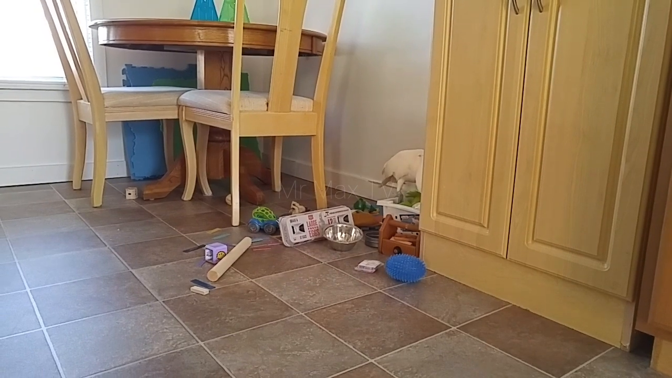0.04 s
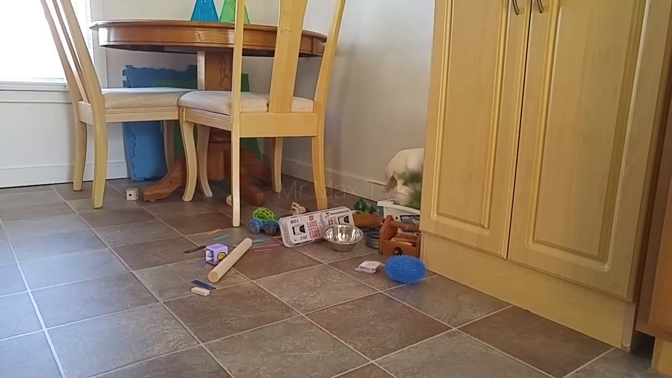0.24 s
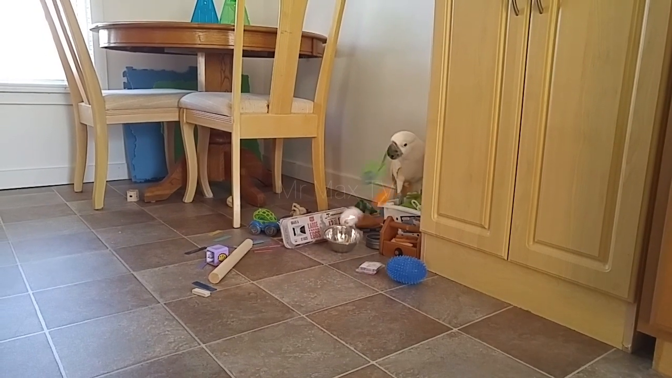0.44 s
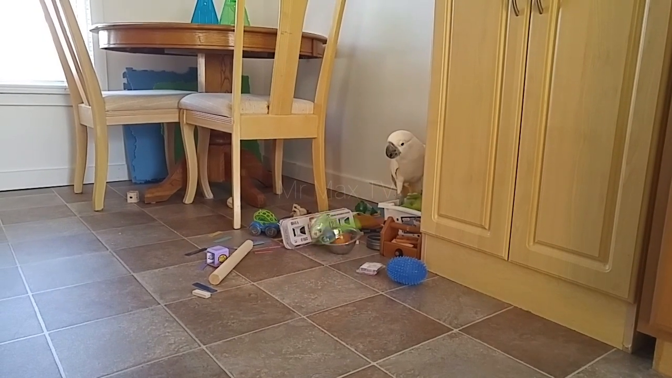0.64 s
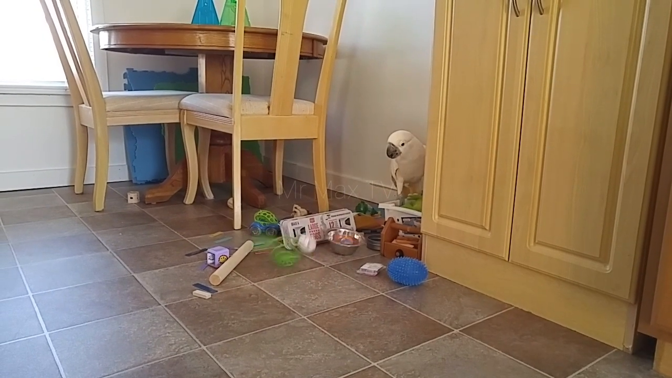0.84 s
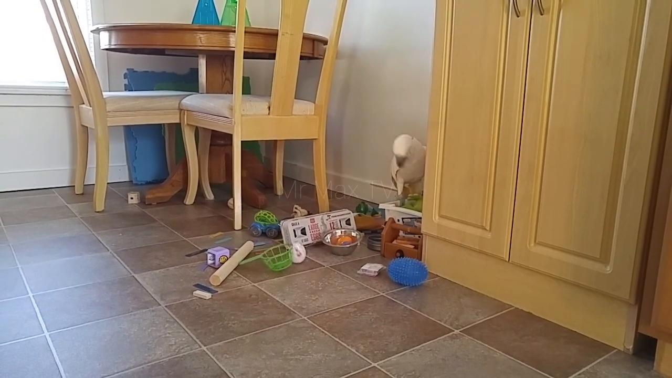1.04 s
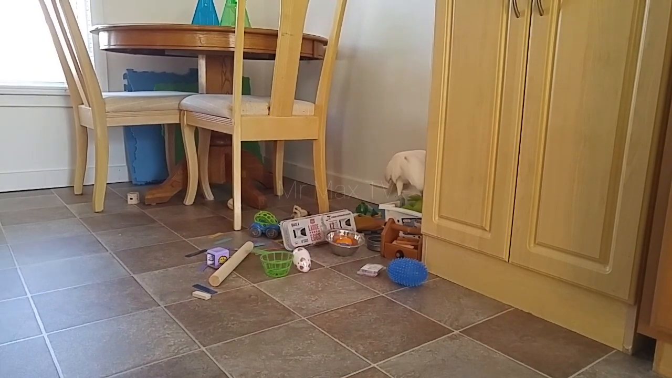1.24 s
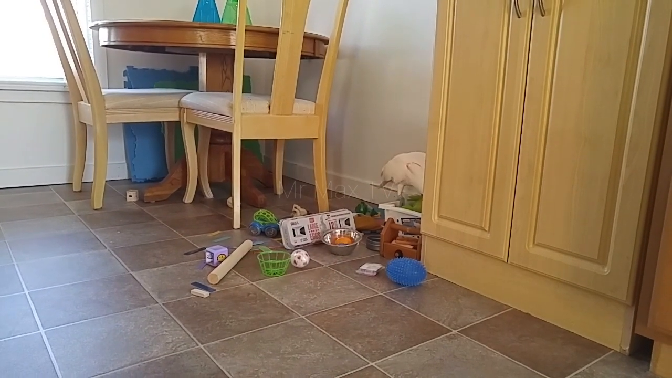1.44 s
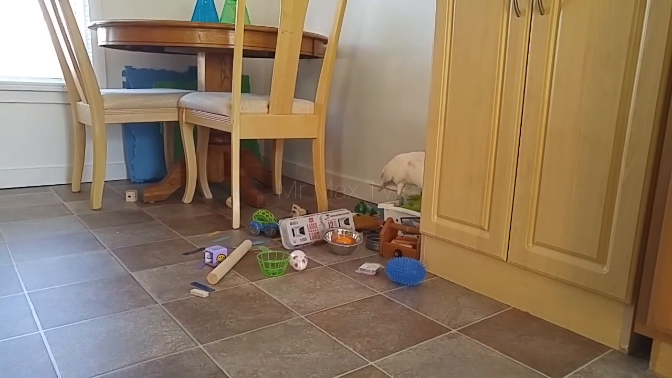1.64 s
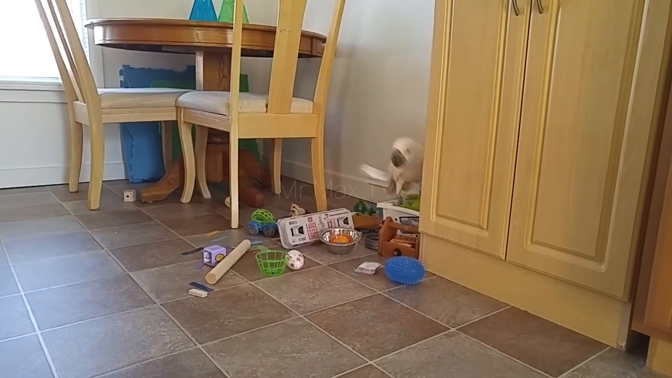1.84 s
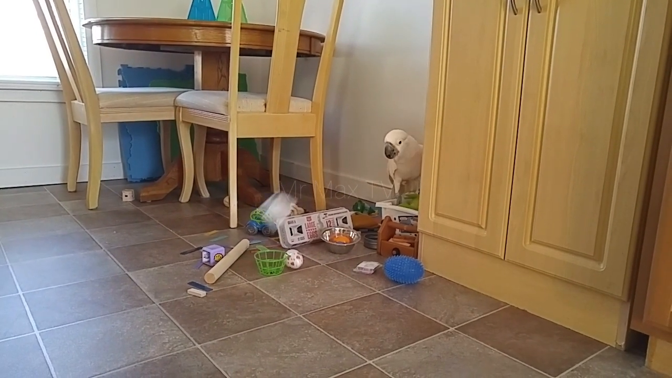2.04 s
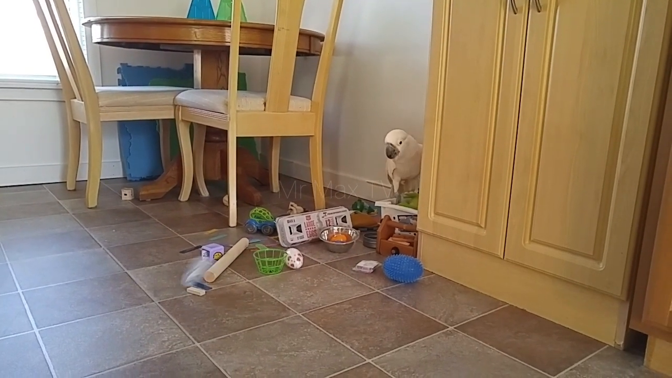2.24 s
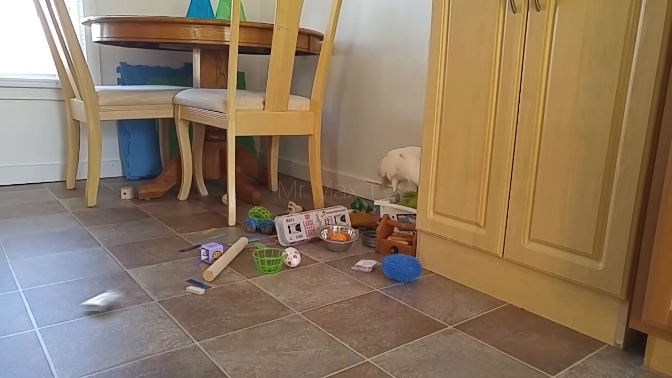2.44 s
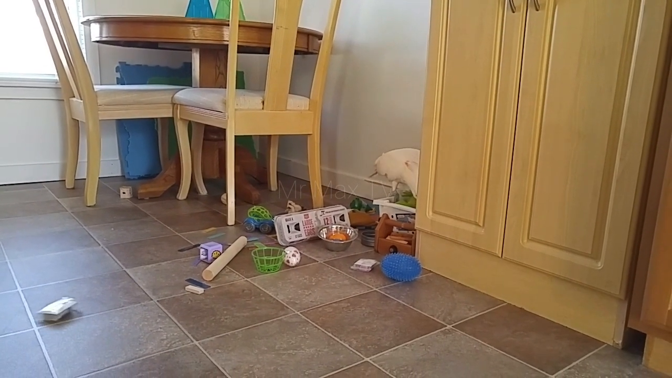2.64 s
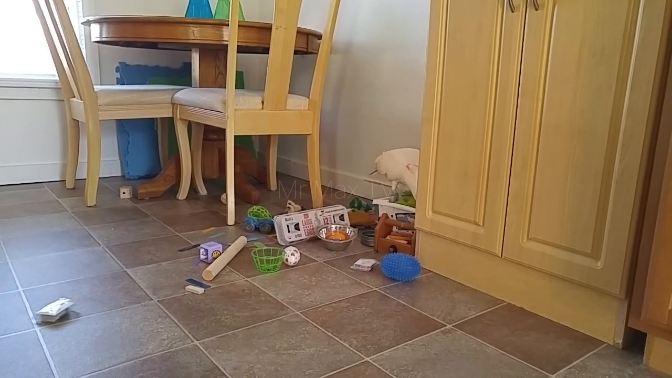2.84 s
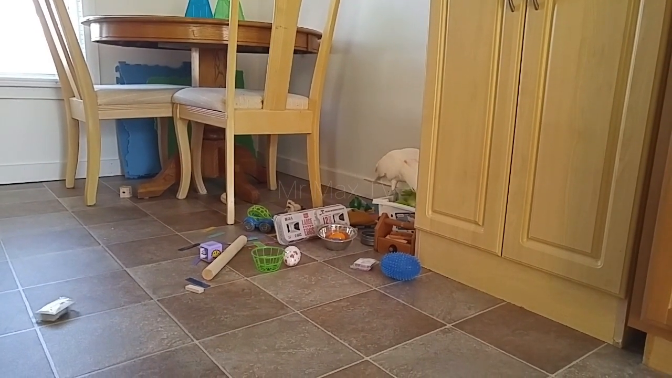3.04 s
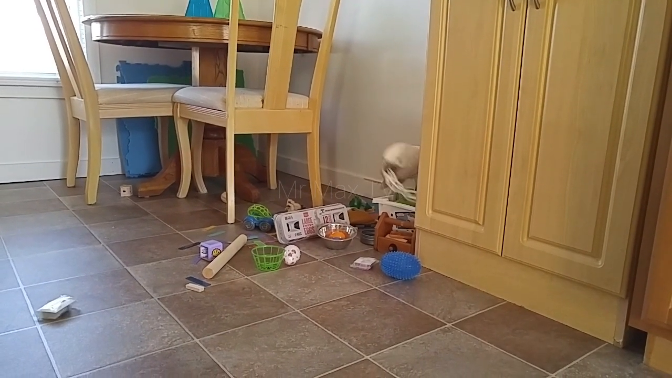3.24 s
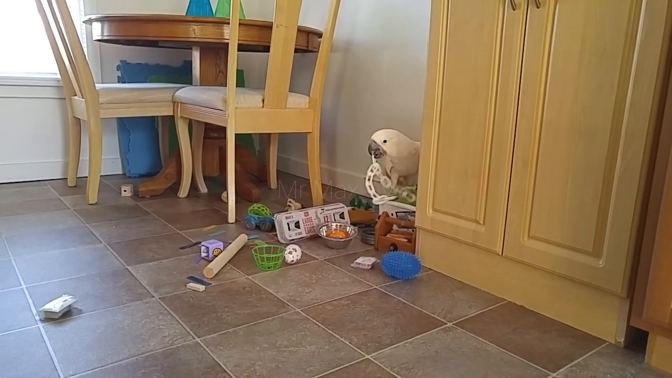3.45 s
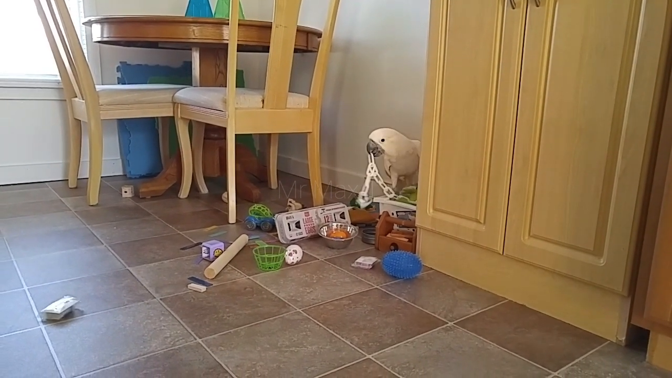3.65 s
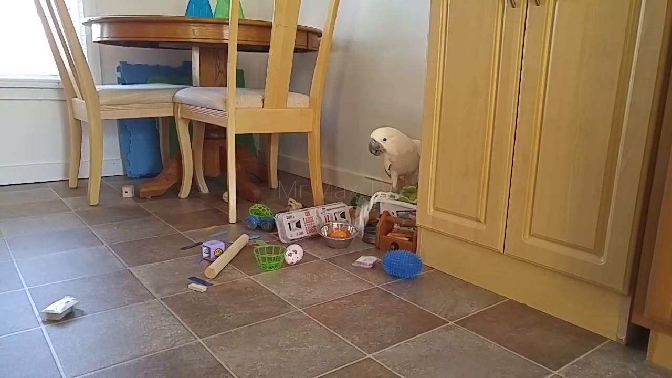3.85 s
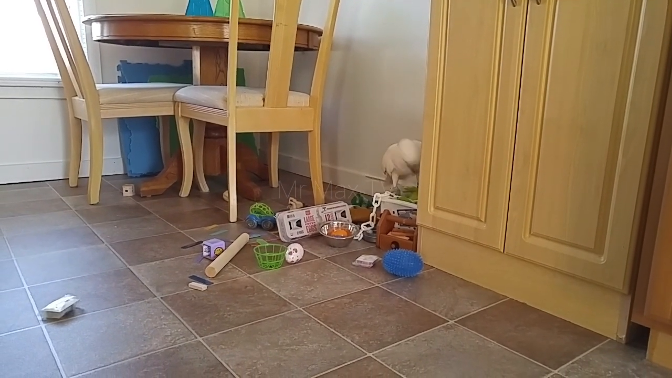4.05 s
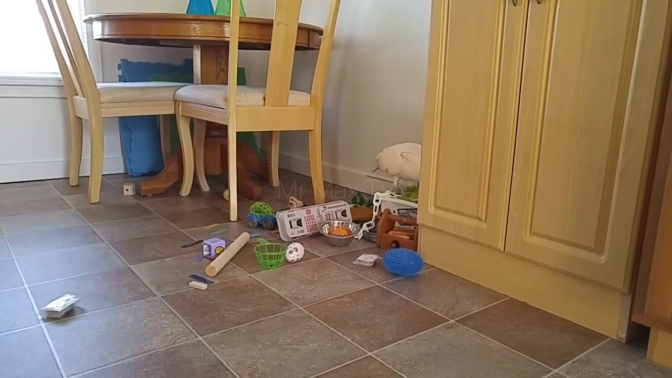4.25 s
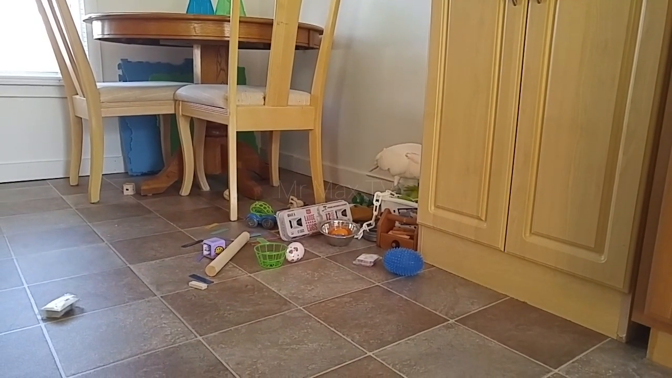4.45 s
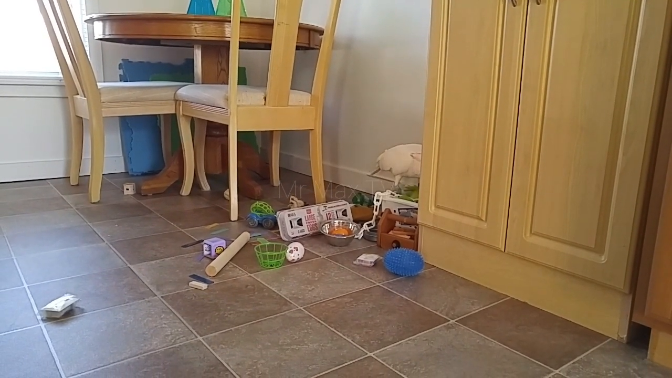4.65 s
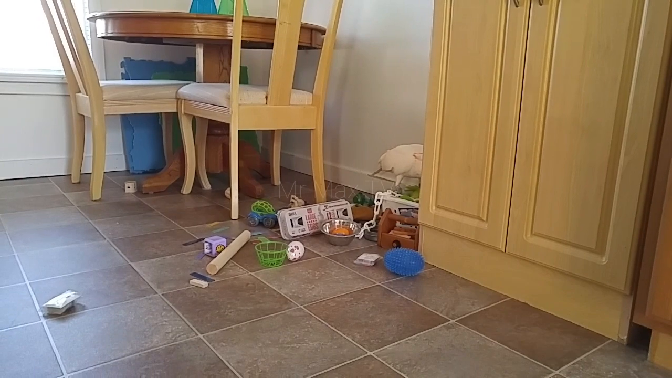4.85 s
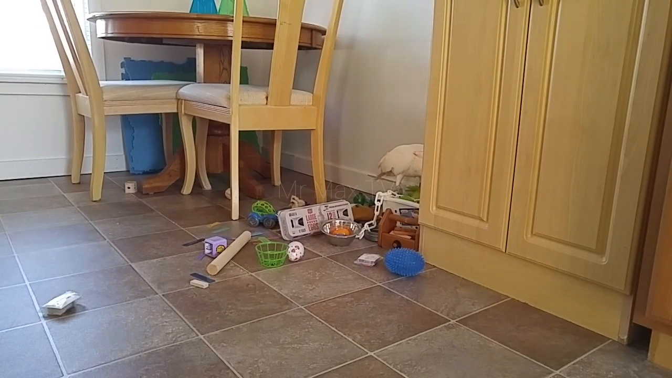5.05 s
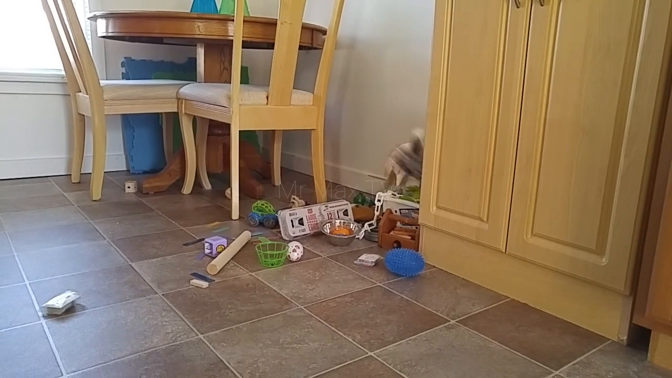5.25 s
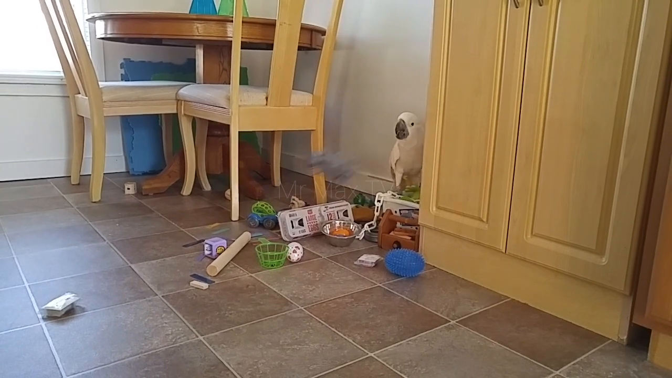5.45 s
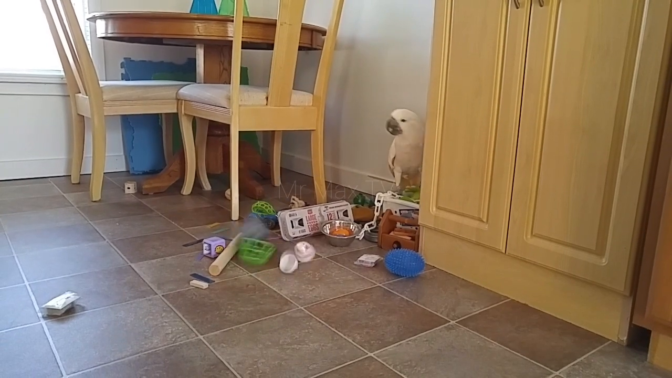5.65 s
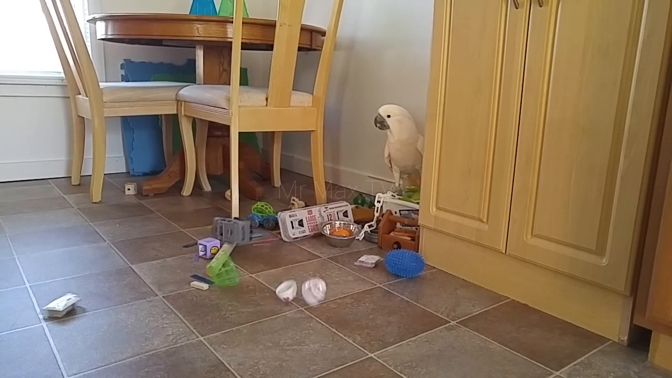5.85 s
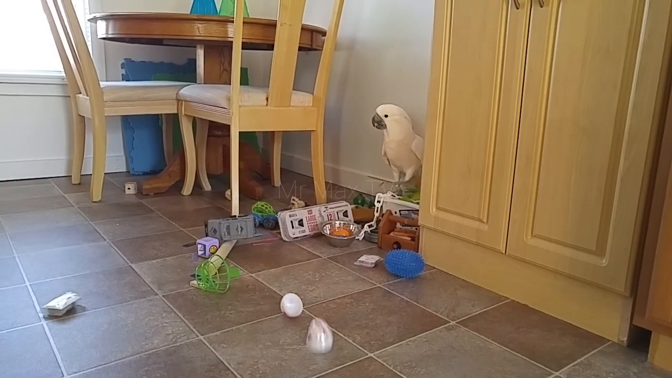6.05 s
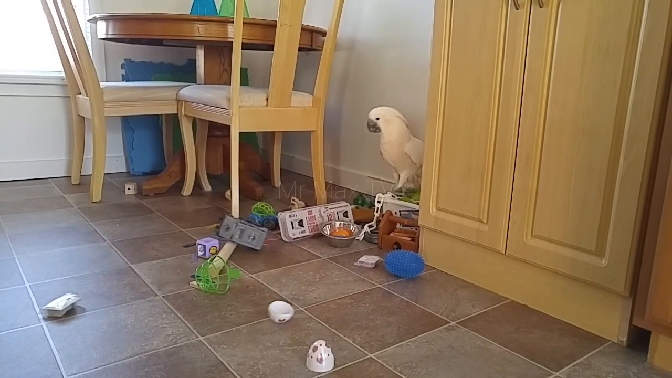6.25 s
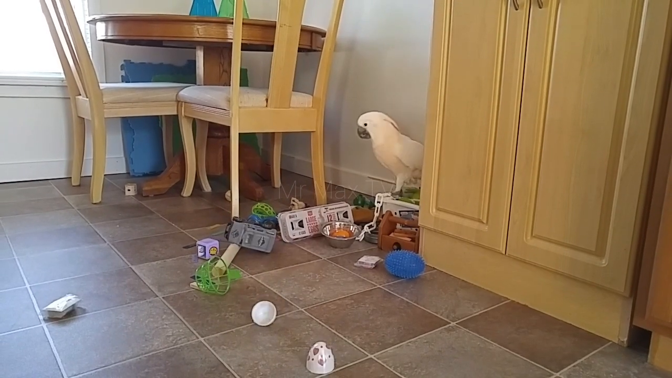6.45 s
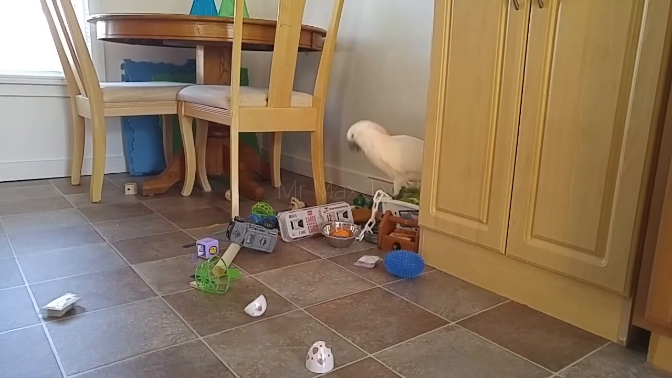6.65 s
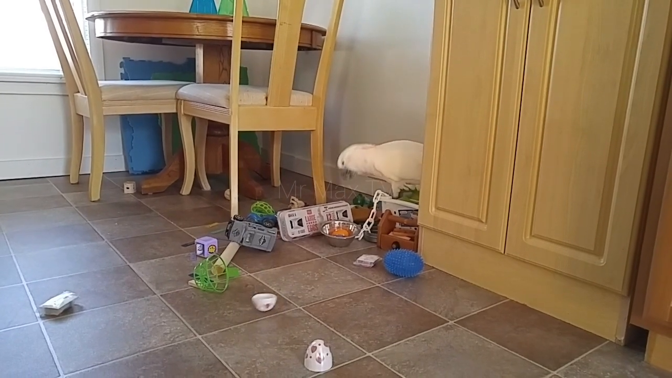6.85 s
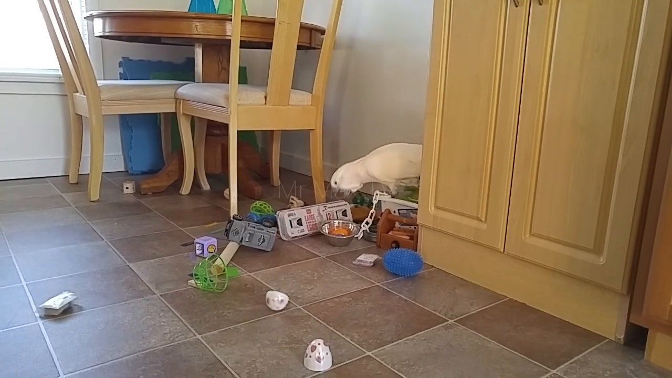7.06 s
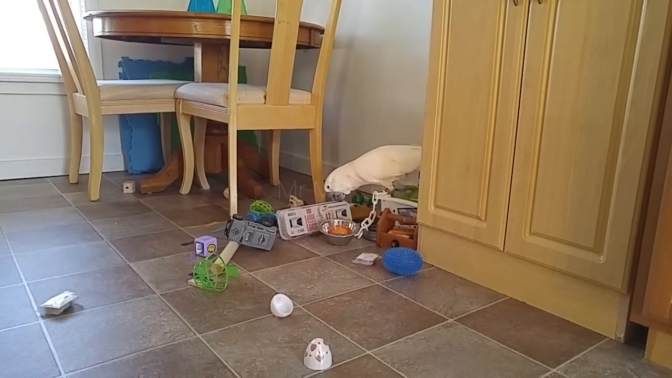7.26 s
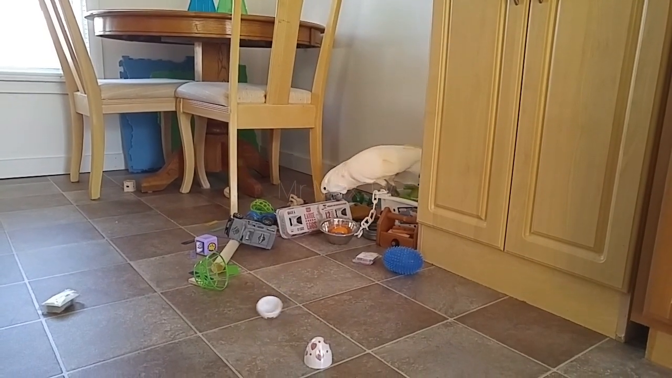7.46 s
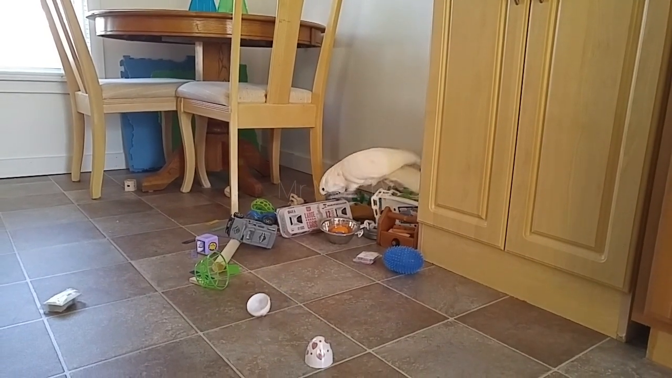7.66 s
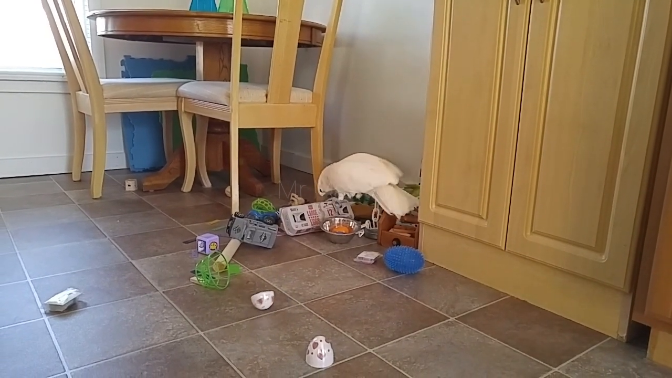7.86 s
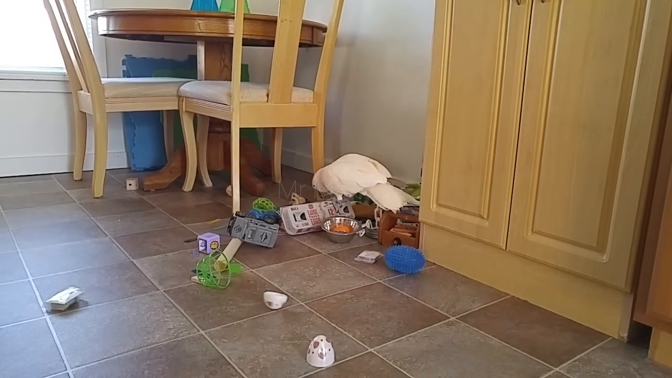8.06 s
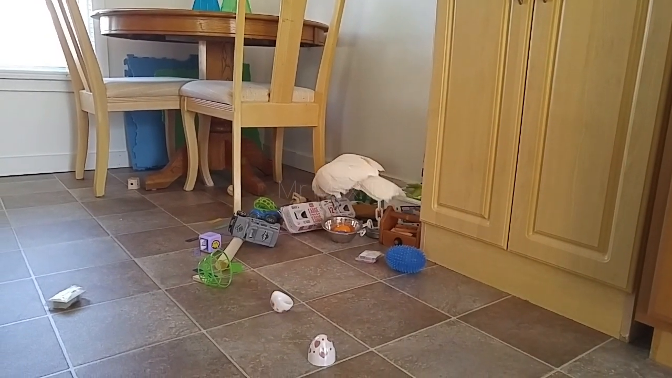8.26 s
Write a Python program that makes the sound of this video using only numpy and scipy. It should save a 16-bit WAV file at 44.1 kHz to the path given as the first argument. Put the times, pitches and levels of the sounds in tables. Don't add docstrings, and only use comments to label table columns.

```python
import sys
import numpy as np
from scipy import signal
from scipy.fft import rfft, irfft, next_fast_len
from scipy.io import wavfile
from scipy.ndimage import uniform_filter1d, map_coordinates

SR = 44100
rng = np.random.default_rng(int(sys.argv[2]) if len(sys.argv) > 2 else 0)


def digitize_waveform(pressure):
    field = np.atleast_2d(pressure).T
    bounded = np.clip(field, -1, 1)
    quanta = np.round(bounded * 32767).astype(np.int16)
    wavfile.write(sys.argv[1], SR, quanta)


def elevation(decibels):
    levels = np.asarray(decibels, float)
    return 10 ** (levels / 20)


N = 366030

# [f/Hz, level/dB per Hz]
SCRATCH = [(880, -17.5), (1500, -7), (1760, -14.5), (1830, -3), (2180, -6), (2950, -4.5), (5130, -7),
           (7010, -0.5), (7830, -2), (8570, 2), (11200, -12), (14500, -16.5), (16000, -37), (16700, -83)]


def heap():
    # [t/s, click level/dB, hollow shell re click/dB, shell pitch f/Hz]
    basket = [(0.3933, -46, -3, 660), (0.412, -21.5, 0, 1810), (0.422, -27.5, 6.5, 790),
              (0.4338, -28, 13.5, 1080), (0.4495, -11.5, 5, 2400), (0.466, -15, -2, 2720),
              (0.5299, -2.5, -15, 543), (0.6074, -13, -10, 387), (0.6788, -2, -21.5, 880),
              (0.729, -2.5, -15, 1260), (0.7644, -3, -2, 830), (0.8115, -19, -17, 586),
              (0.996, -13, -5, 1400), (1.0035, -10, -40, 1400)]
    pecks = [(0.2457, -44.5, 16, 1070), (0.2893, -21.5, -10.5, 715), (1.1519, -20.5, -4.5, 1140),
             (1.3425, -23, -12, 1470), (1.6187, -33, -30, 1450), (1.6427, -25.5, -17, 853),
             (1.9267, -21, -25, 620), (2.0346, -35, -37, 1950), (3.1224, -32, 2.5, 860),
             (3.1642, -20.5, -5.5, 910), (4.571, -40, -8, 781), (4.7252, -39, 7, 1100),
             (5.0893, -41, 8, 1010), (5.2285, -31, 0, 1090), (5.4025, -61, 4, 738), (6.992, -33, -10, 2090),
             (7.196, -36.5, 11.5, 640), (7.2446, -40, -16, 960)]
    car = [
        (2.2272, -23.5, -11, 740),
        (2.2494, -26.5, -4, 900),
        (2.2541, -6, -3, 802),
        (2.262, -21.5, 6, 423),
        (2.275, -24.5, 5, 324),
        (2.4547, -3.5, -9.5, 1250),
        (2.465, -17, -1.5, 806),
        (2.472, -23, 4, 1950),
        (2.5685, -18.5, -2, 1120),
    ]
    chain = [(3.1799, -10.5, -20, 2950), (3.186, -23.5, 3, 1840), (3.3826, -9, -2.5, 914),
             (3.389, -11, -1.5, 667), (3.401, -15.5, 6.5, 1920), (3.404, -21.5, 7.5, 740),
             (3.417, -24, -4, 740), (3.487, -20, 8, 1820), (3.5145, -16.5, 3.5, 3000),
             (3.523, -20.5, 0.5, 680), (3.8342, -19, -6.5, 790), (3.9495, 1, -17, 1680),
             (3.9822, -8, -12, 870), (3.9993, -7, -11.5, 566)]
    claws = [
        (6.6863, -27, 4.5, 1980),
        (6.7285, -22.5, -7, 815),
        (7.432, -20, -9, 890),
        (7.4763, -1.5, -35, 2600),
        (7.4906, -8.5, -6, 2160),
        (7.6144, -19.5, -3.5, 1850),
        (7.7213, -16.5, -26, 746),
    ]
    bounces = [
        (2.248, -21, -16, 940),
        (3.966, -5.5, -4, 1650),
        (5.404, -60.5, 21.5, 2170),
        (.885, -13.5, 1, 890),
        (7.834, -26, -11, 1800),
        (7.852, -26.5, 7, 2390),
        (7.886, -27.5, 7.5, 2900),
        (7.9, -32, 8.5, 2200),
        (7.92, -37, -5, 2700),
    ]
    blows = contacts(basket, thud_db=-20, loose=0.55) + contacts(pecks, thud_db=-28, loose=0.62)
    blows += contacts(car, thud_db=-21.5, loose=0.67) + contacts(chain, thud_db=-22.5, loose=1)
    blows += contacts(claws, thud_db=-25, loose=0.84) + contacts(bounces, thud_db=-12, loose=0.53)
    return elevation(3.5) * knocks(blows)


def tumbling_crate():
    # [t/s, click level/dB, hollow shell re click/dB, shell pitch f/Hz]
    crate_hits = [(5.6648, -4.5, 0, 1100), (5.6965, 4, -10, 1900), (5.702, -9.5, 0, 1070),
                  (5.7143, -8, -1, 1590), (5.729, -16, -4, 875), (5.756, -19, 5, 1400),
                  (5.7786, -4.5, -1.5, 1600), (5.785, -17, 5.5, 625), (5.794, -18, 0, 470),
                  (5.809, -16, -5, 390), (5.823, -23, -11, 500), (5.842, -16, 2, 1360),
                  (5.869, -15, 2.5, 1030), (5.882, -17.5, 0, 1670), (5.9, -19, -2, 1250),
                  (5.949, -30, 4, 1440), (6.3281, -16.5, -4, 1460), (6.332, -14.5, 6.5, 1030),
                  (6.369, -25.5, 10, 1500), (6.376, -34, 7, 740), (6.4206, -22.5, 7, 1760),
                  (6.432, -28, 0, 2870)]
    return elevation(4.0) * knocks(contacts(crate_hits, thud_db=-11, loose=0.49))


def plastic_cups():
    # [t/s, click level/dB, hollow shell re click/dB, shell pitch f/Hz]
    cup_hits = [(6.0208, -17.5, 7, 1450), (6.046, -11.5, 4, 1420), (6.0577, -22.5, 11.5, 1400),
                (6.068, -37, -3, 2000), (6.1706, -16, 7, 1140), (6.175, -24, 11, 810),
                (6.182, -23, 7, 1400), (6.19, -25, 9, 900), (6.21, -29, 9, 840), (6.2374, -22, 10, 950),
                (6.259, -30, 10.5, 950), (6.268, -41, 10, 1240), (6.276, -24.5, 7, 1100),
                (6.296, -21.5, 2, 1040), (6.31, -24, 7.5, 980)]
    mug_hits = [
        (7.775, -48, 12, 680),
        (7.793, -37, 13.4, 716),
        (7.815, -47, 15, 703),
        (7.843, -38, 10, 740),
        (7.8521, -26, 15.7, 698),
        (7.8644, -34, 10, 622),
        (7.8855, -24, 6.5, 765),
        (7.8994, -30.5, 14.5, 726),
        (7.918, -45, 10, 730),
        (7.94, -40.5, 18.6, 708),
    ]
    saucer_hits = [
        (4.4224, -43, 6.3, 1120),
        (4.5856, -45, 9, 1070),
        (4.6287, -38.5, 7.7, 1060),
        (4.641, -39.5, 14, 1080),
        (4.9558, -42, 9.5, 1120),
        (4.9728, -42, 13.7, 1085),
    ]
    blows = contacts(cup_hits, thud_db=-17.5, loose=0.4) + contacts(mug_hits, thud_db=-6, loose=0.2)
    return elevation(4.0) * knocks(blows + contacts(saucer_hits, thud_db=-19, loose=0.24))


def shuffle():
    # [t/s, scratch level/dB, hollow re scratch/dB, held/s]
    drags = [(0.269, -36.5, 4, 0.041), (.43, -20, -3, 0.093), (.6, -31, 8.5, 0.058), (.7, -19.5, -1, 0.099),
             (.9, -30.5, 2.5, 0.063), (1.19, -32, -5, 0.02), (1.38, -44, -1.5, 0.085),
             (1.66, -38.5, -15, 0.047), (1.809, -30, -7.5, 0.013), (2.92, -48.5, 3.5, 0.095),
             (3.04, -39.5, -7, 0.2), (3.21, -30, -6, 0.28), (3.52, -33.5, -10, 0.085),
             (3.63, -42, -19, 0.077), (3.76, -39, -7, 0.023), (4.08, -25.5, -4, 0.012),
             (4.61, -43, 4.5, 0.011), (4.72, -59, 17, 0.048), (5.21, -46.5, 5, 0.05),
             (5.88, -33.5, 5, 0.076), (7.62, -35.5, 2.5, 0.13), (7.86, -40.5, 16.5, 0.011),
             (8.08, -66.5, 15.5, 0.25)]
    skids = [(1.0, -21, -4.5, 0.014), (2.257, -32.5, 4.5, 0.032), (2.458, -44.5, 0, 0.19),
             (3.385, -32, 6, 0.13), (3.836, -26.5, -3, 0.054), (3.952, -24, 0.5, 0.011),
             (4.958, -56.5, 20, 0.015), (5.092, -55, 18, 0.031), (5.698, -21, 2, 0.047),
             (6.023, -52.5, 19.5, 0.19), (6.33, -34.5, 5.5, 0.1), (6.689, -35.5, -5, 0.11),
             (7.187, -56, 16, 0.093), (7.478, -29, 2, 0.012)]
    # [t/s, rumble level/dB, held/s]
    shoves = [(.25, -57, 0.11), (.535, -21.5, 0.092), (0.698, -16, 0.088), (1.0, -36, 0.1),
              (1.36, -43, 0.11), (1.64, -41, 0.069), (1.8, -40, 0.034), (2.26, -31.5, 0.016),
              (2.46, -38, 0.14), (3.0, -42.5, 0.11), (3.49, -31.5, 0.1), (3.78, -41, 0.052),
              (3.955, -27, 0.073), (4.16, -42, .04), (4.48, -43, 0.52), (5.23, -41, 0.059),
              (5.675, -21, 0.079), (5.8, -14, 0.016), (5.98, -44.5, 0.36), (6.33, -40.5, 0.23),
              (7.193, -35, 0.044), (7.73, -37, 0.049), (7.861, -33.5, 0.046), (8.08, -39.5, 0.28)]
    # [f/Hz, width/Hz, level/dB]
    hollows = [(685, 142, 5.5), (1140, 340, -1.5), (2090, 3100, -6)]
    scratching, hollow = np.hypot(dragging(drags, rise=264), dragging(skids, rise=4000))
    shoving = strokes(*np.transpose(shoves), rise=790, fall=124)
    clump = elevation(6.76 * map_coordinates(rng.standard_normal(N // 500 + 4), [np.arange(N) / 500]))
    clump = clump / np.sqrt(uniform_filter1d(clump ** 2, size=3000))
    grit = rng.standard_normal((3, N)) * rng.exponential(1, (3, N)) * clump

    def shells(f):
        total = 0
        for k, (hz, width_hz, db) in enumerate(hollows):
            total = total + (-1) ** k * elevation(db) * resonance(f, hz, width_hz)
        return resonance(f, 1130, 710) * total

    scratch = unit(signal.fftconvolve(grit[0], causal(SCRATCH))[:N])
    body = unit(filtered(grit[1], shells))
    rumble = unit(filtered(grit[2], lambda f: resonance(f, 312, 340) ** 2))
    return elevation(-4) * scratching * scratch + elevation(-5.5) * hollow * body + elevation(-11.5) * shoving * rumble


def steel_bowl():
    # [t/s, level/dB, lean to the high modes/dB per octave]
    bowl_blows = [
        (0.53, -18, 1),
        (0.584, -12, 1),
        (0.608, -8, 1),
        (0.645, -9, 0),
        (0.678, -6, 0),
        (0.72, -6, -1),
        (0.765, -4, 0),
        (0.809, -12, 0),
        (0.869, -14, 1),
        (0.919, -15, 1),
    ]
    lid_blows = [
        (0.53, 0, -4),
        (0.608, -7, -4),
        (0.69, -5, -2),
        (0.735, -3, 0),
        (0.809, -8, 0),
        (0.869, -9, 1),
        (0.93, -10, 1),
    ]
    spoon_blows = [
        (0.53, -16, 7),
        (0.678, -6, 0),
        (0.735, -13, 0),
    ]
    ladle_blows = [
        (.54, -17, 0),
        (.61, -14, 0),
        (.755, -4, 0),
        (.811, -3, 0),
        (.9, -13, 0),
    ]
    # [f/Hz, level/dB, time to fall 60 dB/s]
    bowl_modes = [(428, -8, .3), (858, -1, .4), (7407, -20, .35), (8635, -24, .2), (9302, -22, .2)]
    lid_modes = [(2556, -4, .9), (3850, -16, .7), (4721, -16, .7)]
    spoon_modes = [(2268, 0, .25), (3915, -3, .2)]
    ladle_modes = [(2189, 0, .28), (2168, -8, .4)]
    # [t/s, level/dB]
    choke = [(0, 11.5), (.99, -2.5), (1.04, -7), (1.3, -38)]
    pieces = [(bowl_blows, bowl_modes), (lid_blows, lid_modes), (spoon_blows, spoon_modes), (ladle_blows, ladle_modes)]
    ring = sum(ringing(*piece, split_hz=18.0, rock_db=3.0) for piece in pieces)
    return elevation(curves(choke)[0] - 10.5) * ring


def steel_dish():
    # [t/s, level/dB, lean to the high modes/dB per octave]
    dish_blows = [
        (0, -49, -21),
        (.42, -4, 5),
        (.5, -6, 0),
        (.58, -6, 0),
        (.73, -8, -4),
        (.99, -12, -3),
        (1.25, -21, -6),
    ]
    # [f/Hz, level/dB, time to fall 60 dB/s]
    dish_modes = [(1406, -11, 1.45), (1904, -21.5, 1.6), (853, -17.5, 0.77)]
    return elevation(-12) * ringing(dish_blows, dish_modes, split_hz=11, rock_db=1.5)


def small_bell():
    # [t/s, level/dB, lean to the high modes/dB per octave]
    bell_blows = [
        (3.179, -12, 0),
        (3.9499, 3, .5),
        (3.9822, 4, .8),
        (3.9992, 3, -2),
        (4.03, 0, -3),
        (4.0755, 0, 0),
        (4.13, -4, -1),
        (4.1596, -8, -1),
    ]
    # [f/Hz, level/dB, time to fall 60 dB/s]
    bell_modes = [(1856, 1, .45), (3387, 2, .6), (4102, 1, .5), (7200, 0, .12), (7354, 4, .35),
                  (7886, -1, .3), (7957, 2, .4), (8803, 3, .45), (9668, 0, .33), (10250, -5, .2),
                  (11020, -9, .25), (11750, -10, .25), (12340, -10, .2), (13250, -12, .2)]
    # [t/s, level/dB]
    rest = [(0, -13), (4.2, 0.5), (4.3, -46), (4.36, -59)]
    return elevation(curves(rest)[0] - 34) * ringing(bell_blows, bell_modes, split_hz=24.6, rock_db=5.5)


def spinning_cup():
    # [t/s, level/dB, lean to the high modes/dB per octave]
    spin_blows = [
        (6.058, -23, 0),
        (6.083, -10, 0),
        (6.13, -22, 0),
        (6.152, -13, 0),
    ]
    # [f/Hz, level/dB, time to fall 60 dB/s]
    spin_mode = [(1400, 0, .12)]
    return elevation(-10.5) * ringing(spin_blows, spin_mode, split_hz=60, rock_db=3.0)


def cupboard_panel():
    # [t/s, level/dB, lean to the high modes/dB per octave]
    panel_blows = [
        (.535, -23.5, 0),
        (.68, -22.5, 0),
        (2.256, -22.5, 1),
        (3.955, -27.5, 0.32),
        (5.666, -16.5, 0),
        (5.78, -18.5, 0.2),
        (5.87, -20, 0.076),
        (5.95, -28, 0.083),
        (6.33, -23.5, 0),
        (6.37, -27, 0.1),
    ]
    # [f/Hz, level/dB, time to fall 60 dB/s]
    panel_modes = [(62.3, -9.5, 0.27), (134.6, -4.5, 0.35), (181, -5, .2), (269.4, -6, 0.13)]
    return elevation(-3.0) * ringing(panel_blows, panel_modes, split_hz=14, rock_db=4.5)


def kitchen(x, count=5, size=4096):
    # [f/Hz, time to fall 60 dB/s]
    room_t60 = [(150, 0.21), (600, 0.2), (2000, 0.32), (6000, 0.26), (14000, 0.21)]
    hz, t, z = signal.stft(rng.standard_normal((count, 2, SR * 3 // 5)), SR, nperseg=256)
    tails = signal.istft(z * elevation(-60 * t / along(room_t60, hz)[:, None]), SR, nperseg=256)[1]
    tails = tails * (1 - np.exp(-np.arange(tails.shape[-1]) / SR / 0.004))
    turn = np.arange(N) / size % count
    wet = 0
    for k, tail in enumerate(tails):
        distance = np.abs((turn - k + count / 2) % count - count / 2)
        stretch = x * np.clip(1 - distance, 0, 1)
        wet = wet + signal.fftconvolve(stretch[None], tail / np.linalg.norm(tail[0]), axes=1)[:, :N]
    return widen(wet)


def fridge():
    # [f/Hz, level/dB per Hz]
    air_colour = [(24, -28), (40, -5), (65, -8), (160, -11.5), (239, -9.5), (377, -2), (523, -22),
                  (639, -5), (910, -14.5), (1890, -22), (4680, -33), (8570, -26), (12200, -42),
                  (14500, -36), (16500, -92)]
    # [t/s, level/dB]
    air_level = [(0, -50.5), (.2, -46), (.5, -41), (1.5, -49), (2.2, -52.5), (2.7, -46), (4.3, -51),
                 (4.6, -46), (5.6, -48.5), (7.1, -49), (7.6, -44), (8.3, -46.5)]
    # [f/Hz, level/dB]
    hum_tones = [(59.2, -56.5), (118.4, -62.5), (183.0, -66.5), (242.2, -60), (290.7, -68), (360.7, -74.5)]
    air = widen(filtered(rng.standard_normal((2, N)), lambda f: elevation(along(air_colour, f))))
    t = np.arange(N) / SR

    def sway():
        return map_coordinates(rng.standard_normal(int(N * 9 / SR) + 4), [t * 9])

    hum = 0
    for hz, db in hum_tones:
        hum = hum + elevation(db + 51 + 2.2 * sway()) * np.sin(2 * np.pi * hz * t + 1.2 * sway())
    return elevation(curves(air_level)[0]) * (elevation(-1.5) * unit(air) + hum)


def contacts(rows, thud_db, loose):
    middle_db, soft_thud = -24, 0.47
    return [(s, db, body_db, hz, thud_db + soft_thud * (middle_db - db), loose) for s, db, body_db, hz in rows]


def knocks(blows):
    out, t = np.zeros((2, N + SR)), np.arange(SR // 6) / SR
    f = np.fft.rfftfreq(len(t), 1 / SR)
    lead = round(.003 * SR)
    tick = rfft(causal(SCRATCH), len(t))
    tile = resonance(f, 428, 114) - 0.34 * resonance(f, 281, 106) + 0.71 * resonance(f, 108, 37)
    tile = tile * resonance(f, 284, 590)
    for s, db, body_db, hz, thud_db, loose in blows:
        loose = np.clip(loose, .05, 1.5)
        spiky = rng.standard_normal(len(t)) * rng.exponential(1, len(t))
        chatter = .07 * loose * spiky * elevation(-60 * t / (0.008 + 0.045 * loose))
        force = np.array([chatter, 0 * t])
        force[:, 0] = 1, np.sqrt(np.sum(force[0] ** 2) + 1)
        force = np.roll(force, lead, axis=1)
        force[0, :lead] = .22 * np.tanh(spiky[-lead:]) * np.arange(lead) / lead
        shell = resonance(f, hz, 0.22 * hz * loose)
        for sign, shift in (1, -.5), (1, .55), (-1, 1.2):
            other = hz * (1 + loose * shift)
            shell = shell - 0.35 * sign * resonance(f, other, 0.44 * other * loose)
        shell = shell * resonance(f, 0.99 * hz, 7 * hz * loose)
        for part_db, colour in (3, tick), (body_db, shell), (thud_db + 2.5, tile):
            part = irfft(rfft(force) * colour, len(t))
            out[:, round(s * SR) - lead:][:, :len(t)] += elevation(db + part_db) * part / np.abs(part[0]).max()
    return out[:, :N]


def strokes(start_s, db, held_s, rise, fall):
    t = np.arange(0, N + 128, 128) / SR
    u = t - start_s[:, None]
    level_db = db[:, None] + rise * np.minimum(u, 0) - fall * np.maximum(u - np.abs(held_s)[:, None], 0)
    return np.interp(np.arange(N) / SR, t, np.sqrt(np.sum(elevation(level_db) ** 2, 0)))


def dragging(rows, rise):
    s, db, hollow_db, held = np.transpose(rows)
    return np.array([strokes(s, level_db, held, rise, fall=194) for level_db in (db, db + hollow_db)])


def ringing(blows, modes, split_hz, rock_db):
    out, start = np.zeros(N), round(blows[0][0] * SR)
    t = np.arange(start, min(N, round((blows[-1][0] + 2) * SR))) / SR
    s, db, lean_db = np.transpose(blows)[..., None]
    knots = t[::32]
    age = np.maximum(knots - s, 0)
    for hz, level, t60 in modes:
        luck = rng.normal(0, 1.5, s.shape)
        each = elevation(db + luck + lean_db * np.log2(hz / 2000) - 60 * age / t60)
        each = each * (1 - np.exp(-age / 0.0011))
        rock = map_coordinates(rng.standard_normal(200), [(knots - knots[0]) * 45])
        size = np.interp(t, knots, elevation(level + rock_db * rock) * np.sqrt(np.sum(each ** 2, 0)))
        twin_hz = hz + split_hz * rng.uniform(.4, 1.4)
        pair = np.sin(2 * np.pi * hz * t) + 0.3 * np.sin(2 * np.pi * twin_hz * t)
        out[start:][:len(t)] += size * pair
    return out


def widen(pair):
    # [f/Hz, side re mid level/dB]
    side_db = [(60, -18), (110, -17), (200, -13), (380, -11), (700, -4.5), (1290, -0.5), (2380, 0),
               (4400, -1.5), (8120, 0.5), (15000, -2)]

    def mid_side(f):
        share = elevation(along(side_db, f)) ** 2
        return np.sqrt(np.array([1 + 0 * f, share]) / (1 + share))

    mid, side = filtered(pair, mid_side)
    return np.array([mid + side, mid - side])


def unit(x):
    return x / np.sqrt(np.mean(x ** 2) + 1e-20)


def along(points, hz):
    f, v = np.transpose(points)
    return np.interp(np.log(hz + 1), np.log(f + 1), v)


def curves(rows):
    s, *cols = np.transpose(rows)
    return [np.interp(np.arange(N) / SR, s, c) for c in cols]


def filtered(x, response):
    n = x.shape[-1]
    m = next_fast_len(n + SR // 4)
    return irfft(rfft(x, m) * response(np.fft.rfftfreq(m, 1 / SR)), m)[..., :n]


def resonance(f, hz, width_hz):
    return 1j * f * width_hz / (hz * hz - f * f + 1j * f * width_hz)


def causal(spectrum, size=1024):
    cep = irfft(np.log(elevation(along(spectrum, np.fft.rfftfreq(size, 1 / SR))) + 1e-6), size)
    cep[1:size // 2] *= 2
    cep[size // 2 + 1:] = 0
    h = irfft(np.exp(rfft(cep)), size)
    return h / np.linalg.norm(h)


def scene():
    # [f/Hz, phase/rad]
    port_phase = [(100, 0.05), (1000, 0.6), (2600, 1.35), (4000, 2.54), (8000, 1.31), (15000, 2.1)]
    toys = heap() + shuffle()
    crate, cups = tumbling_crate(), plastic_cups()
    rings = steel_bowl() + steel_dish() + small_bell() + spinning_cup() + cupboard_panel()
    direct = toys[0] + cups[0] + crate[0] + rings
    near = filtered(np.tile(direct, (2, 1)), lambda f: np.exp(.5j * along(port_phase, f) * [[1], [-1]]))
    far = toys[1] + elevation(-4.0) * cups[1] + elevation(-2.5) * crate[1] + elevation(-11) * rings
    return elevation(-4.0) * near + elevation(1.5) * kitchen(far) + fridge()


def top_cut(x):
    return signal.sosfilt(signal.butter(12, 16650, fs=SR, output="sos"), x)


def record(dry):
    # [f/Hz, left re right level/dB]
    ports = [(60, 0.5), (110, 0), (200, -0.5), (380, -0.5), (700, -0.5), (1290, -6), (2380, -5),
             (4400, 2.5), (8120, 0), (15000, 0)]

    def port_colour(f):
        treble_db = 3.1 * np.exp(-((f - 15700) / 900) ** 2)
        bass_cut = 1 + (48 / (f + 1)) ** 6
        return elevation(.5 * along(ports, f) * [[1], [-1]] + treble_db) / bass_cut

    x = filtered(dry, port_colour)
    x = x / (1 + np.abs(x / .76) ** 5) ** (1 / 5)
    x = filtered(x, lambda f: f < 16650)
    return top_cut(x)


dry = scene()
out = record(dry)
digitize_waveform(out)
```